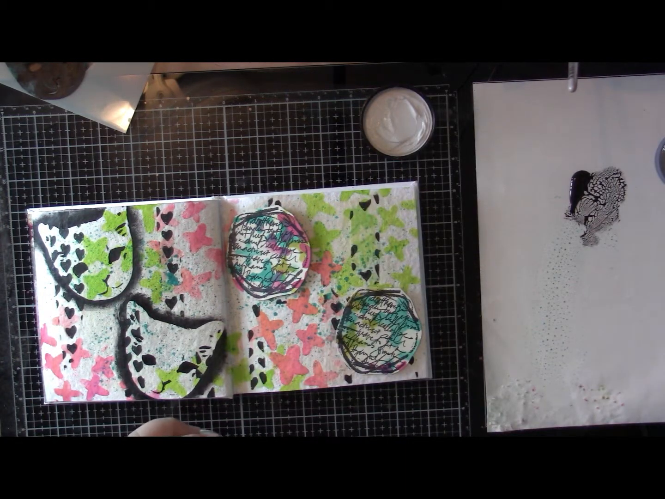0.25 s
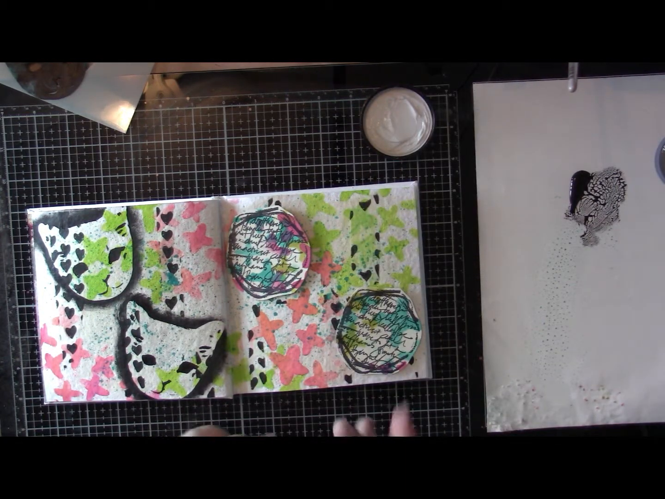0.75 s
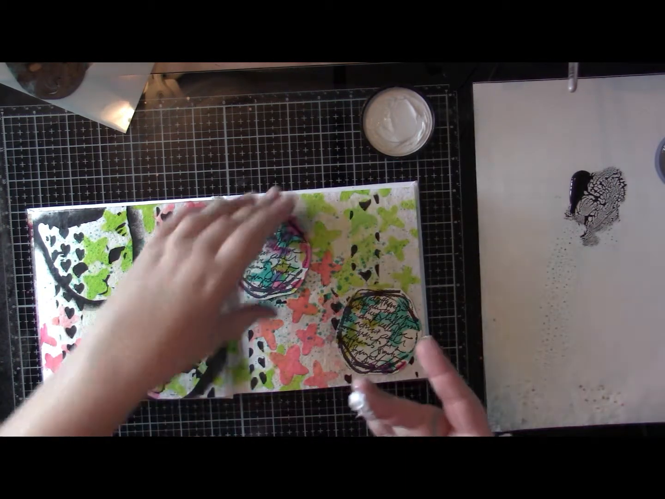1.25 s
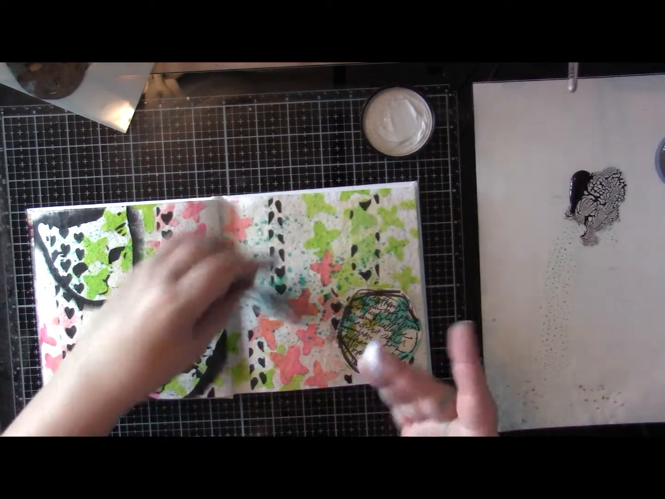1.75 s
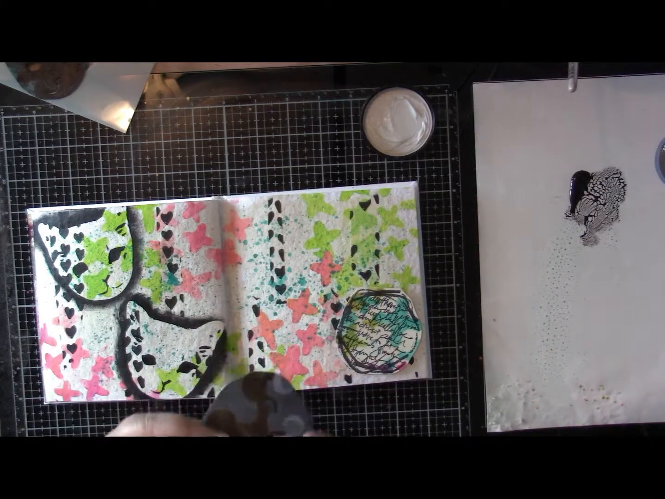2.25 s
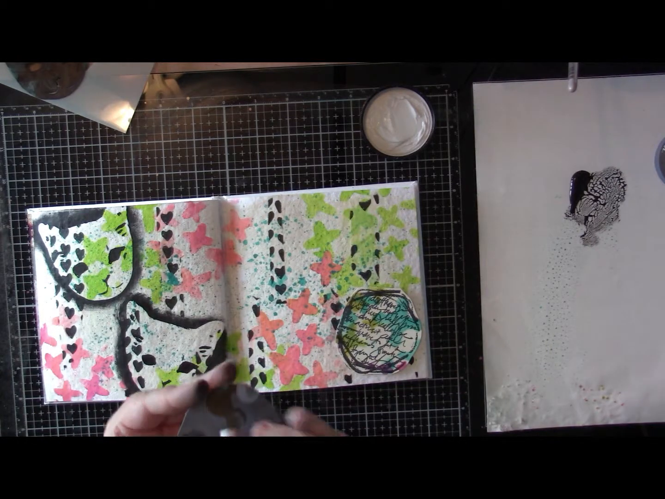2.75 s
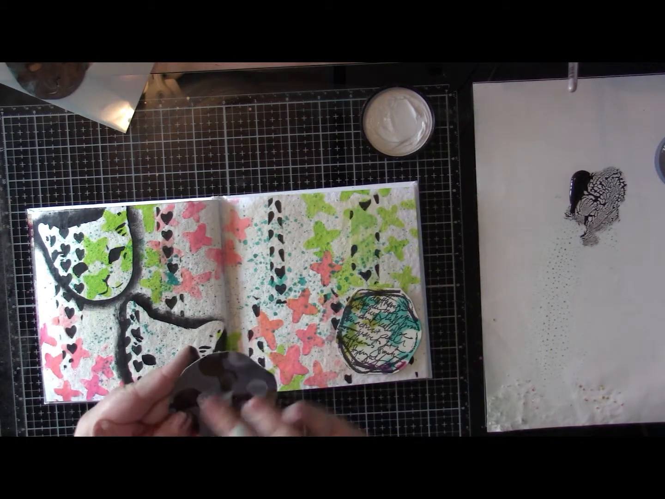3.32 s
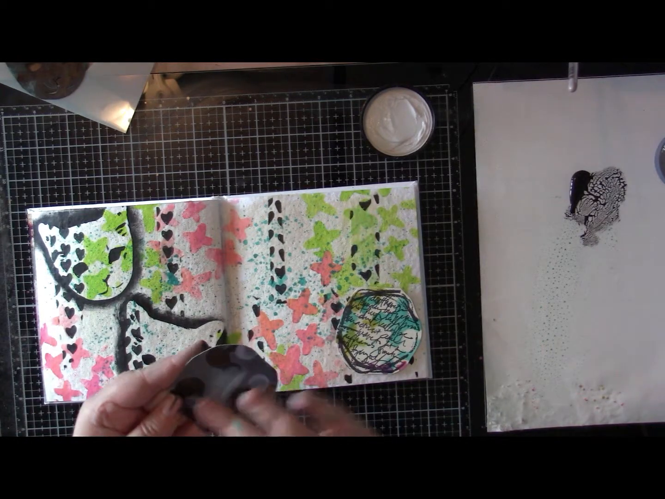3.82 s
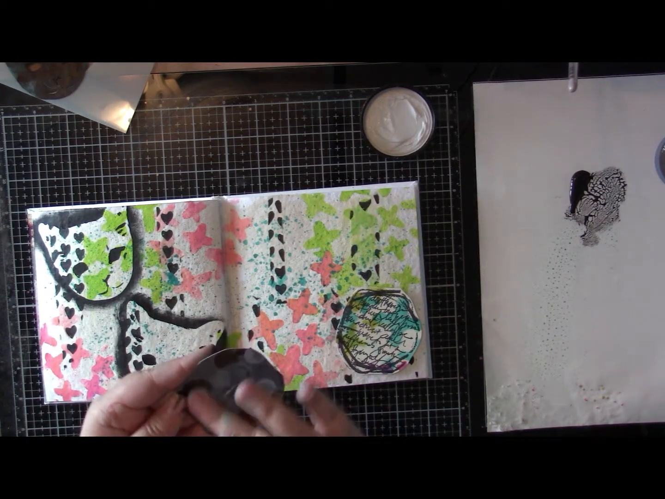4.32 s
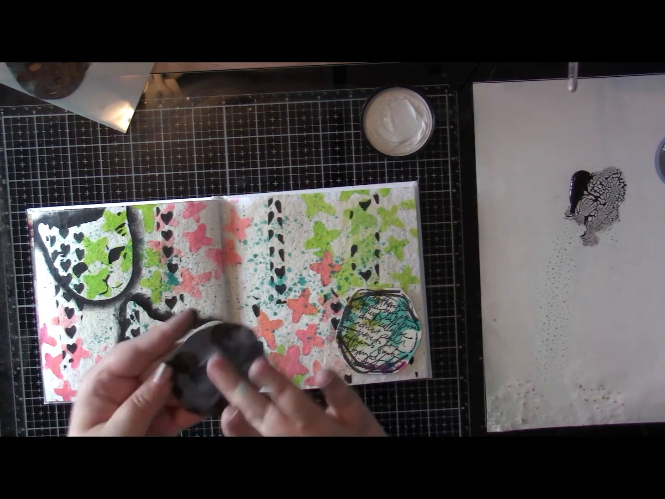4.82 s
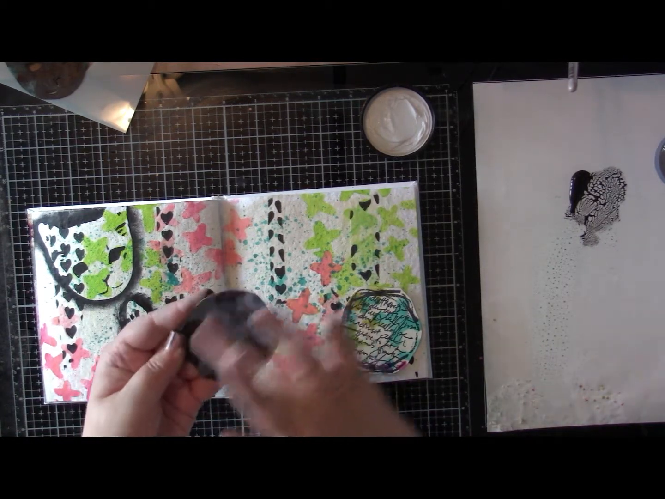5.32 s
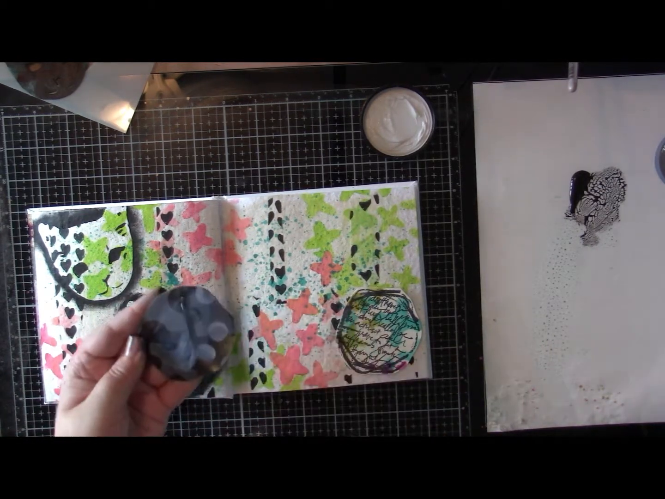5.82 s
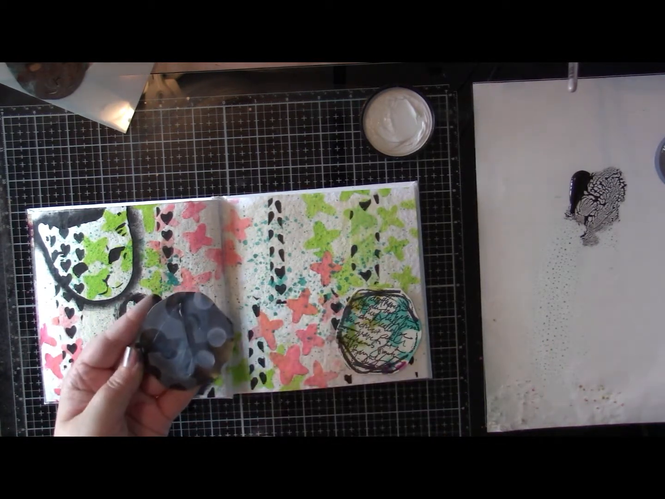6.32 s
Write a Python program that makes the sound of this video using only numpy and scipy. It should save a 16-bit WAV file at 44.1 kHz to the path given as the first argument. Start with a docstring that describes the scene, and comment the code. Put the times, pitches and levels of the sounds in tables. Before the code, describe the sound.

In a quiet room with a low wavering hum, a table is bumped and loose things rattle. A round stamp peels off a painted page with a quick creaking crackle. Fingers then rub it in short dry strokes with tiny snaps and squeaks, and tap it sharply, loudest a little past the middle and again soon after. Close microphone, short room echo.

```python
"""Stamp peeled and rubbed at a craft table

A table is bumped and its loose things rattle; a round stamp peels off a painted page in one continuous pull,
and fingers rub it and tap it sharply, among small snaps and squeaks, over a low wavering room hum. Taps and
bumps are sums of damped modes; peel, snaps, rubbing and squeaks are trains of random stick-slip clicks,
filtered and shaped in time; the hum, air and nail click are filtered noise. Decaying noise gives the room echo,
and two close ports hear almost the same sound."""
import sys
import numpy as np
from scipy import signal
from scipy.fft import rfft, irfft
from scipy.io import wavfile
from scipy.ndimage import uniform_filter1d

SR = 44100
rng = np.random.default_rng(int(sys.argv[2]) if len(sys.argv) > 2 else 0)


def wav_record(signal):
    """Record a signal, one row per channel, as 16-bit PCM in the file named by sys.argv[1]."""
    frames = np.transpose(np.atleast_2d(signal))
    bounded = np.clip(frames, -1, 1)
    # unit amplitude maps onto the largest positive 16-bit level
    quanta = np.round(bounded * 32767).astype(np.int16)
    wavfile.write(sys.argv[1], SR, quanta)


N = 289296
AGE = np.arange(SR // 2) / SR   # time since a contact [s]


def from_db(db):
    """Convert decibels to amplitude gain: 20 dB is a factor of ten."""
    return 10 ** (np.asarray(db) / 20)


def rms_one(x):
    """Normalize the mean power: scale to rms 1."""
    return x / np.sqrt(np.mean(x ** 2) + 1e-20)


def energy_one(x):
    """Normalize the total energy of a transient to 1."""
    return x / np.sqrt(np.sum(x ** 2) + 1e-20)


def at_hz(points, hz):
    """Interpolate a spectrum linearly along a logarithmic frequency axis."""
    points = np.array(points)
    return np.interp(np.log(np.maximum(hz, 1)), np.log(points[:, 0]), points[:, 1])


def in_time(rows):
    """Interpolate levels in decibels: one smoothed gain curve per column, -120 dB outside the rows."""
    s, *columns = np.transpose(rows)
    time = np.arange(N) / SR
    curves = []
    for column in columns:
        level_db = np.interp(time, s, column, left=-120, right=-120)
        curves.append(uniform_filter1d(from_db(level_db), size=400))
    return curves


def coloured(x, spectrum):
    """Minimum-phase filtering: folding the cepstrum gives a causal response of the given magnitude."""
    size = 4096
    hz = np.arange(size // 2 + 1) * SR / size
    cepstrum = irfft(np.log(from_db(at_hz(spectrum, hz))))
    folded = np.r_[cepstrum[0], 2 * cepstrum[1:size // 2]]
    response = irfft(np.exp(rfft(folded, size)))
    return signal.fftconvolve(x, response)[:len(x)]


def band(x, low_hz, high_hz):
    """Butterworth band-pass: maximally flat between two edges."""
    edges = [low_hz, min(high_hz, SR / 2 - 1000)]
    return signal.sosfilt(signal.butter(2, edges, "band", fs=SR, output="sos"), x + 1e-18)


def high_pass(x, order, cutoff_hz):
    """Butterworth high-pass: removes the lowest frequencies."""
    return signal.sosfilt(signal.butter(order, cutoff_hz, "high", fs=SR, output="sos"), x + 1e-18)


def drift(rate):
    """Slow random modulation: straight lines between normal draws of spread 1, rate draws a second."""
    knots = rng.standard_normal(4000)
    return np.interp(np.arange(N) / SR * rate, np.arange(len(knots)), knots)


def grains(per_s, spread_db, count):
    """Random impulse train: clicks of uneven size and either sign at a mean rate; rms 1."""
    sizes = from_db(spread_db * np.minimum(rng.exponential(1, count), 4))
    sizes = sizes * rng.choice([-1, 1], count)
    return rms_one(sizes * (rng.random(count) < per_s / SR))


def dying(t60):
    """Exponential decay of free vibration: 60 dB in t60 seconds."""
    return from_db(-60 * AGE / t60)


def ringing(modes, low_hz, high_hz, rise_s, pitch=1):
    """Modal synthesis: damped sines within one range, with an onset time constant rise_s; energy 1."""
    rings = []
    for k, (hz, db, t60) in enumerate(modes):
        if low_hz <= hz < high_hz:
            sine = np.sin(2 * np.pi * hz * pitch * AGE)
            rings.append((-1) ** k * from_db(db) * dying(t60) * sine)
    return energy_one(sum(rings) * (1 - np.exp(-AGE / rise_s)))


def favouring(modes, spot_hz, db_per_octave):
    """Strike-point weighting: the spot that is struck favours the modes near one pitch."""
    return [(hz, db - db_per_octave * abs(np.log2(hz / spot_hz)), t60) for hz, db, t60 in modes]


def add(track, s, sound):
    """Linear superposition: mix a sound in at time s."""
    start = round(s * SR)
    track[start:start + len(sound)] += sound[:N - start]


def room_tone(air_db=-56.5, hum_hz=335, hum_db=-2.5):
    """Stationary filtered noise for the air, and a noise band of varying level for a fan-like hum and the
    table's low ring after the bumps."""
    # air noise: (frequency [Hz], relative level [dB])
    air_spectrum = [(15, -71), (25, -38.5), (55, -17), (122, -12), (160, -11.5), (215, -11), (274, -11.5),
                    (340, -6.5), (469, -9.5), (509, -10), (552, -11.5), (1080, -21), (1660, -25),
                    (2770, -26.5), (15500, -39.5)]
    # level of the noise band before the hum_db trim: (time [s], level [dB]); the swell near 0.9 s is the table
    # ringing on after the bumps
    hum_course = [(0.0, -70), (0.51, -67), (0.89, -57), (1.17, -67), (3.85, -64.5), (4.48, -65),
                  (6.25, -54.5), (6.56, -65)]
    air = rms_one(coloured(rng.standard_normal(N), air_spectrum))
    hum = rms_one(band(rng.standard_normal(N), hum_hz * 0.85, hum_hz * 1.163))
    hum_level = np.interp(np.arange(N) / SR, *np.transpose(hum_course))
    return from_db(air_db) * air + from_db(hum_level + hum_db) * hum


def room(x, first_echo_s=.006, near_db=0.5, near_t60=0.0388):
    """Reverberation by convolution: a quick decay for near surfaces over a slower one for the walls."""
    # decay of the slow part: (frequency [Hz], t60 [s])
    wall_t60 = [(150, 0.37), (600, 0.19), (1500, 0.31), (3000, 0.32), (6000, 0.42), (12000, 0.27)]
    # colour of the echo against the direct sound: (frequency [Hz], level [dB])
    echo_spectrum = [(100, -15.5), (400, -10.5), (750, -5), (1500, -3), (3000, -11), (6000, -8),
                     (14000, -13.5)]
    edges = np.geomspace(70, 17000, 9)
    tail = 0
    for low, high in zip(edges, edges[1:]):
        walls = dying(at_hz(wall_t60, np.sqrt(low * high)))
        fade = walls + from_db(near_db) * dying(near_t60)
        echo = energy_one(band(rng.standard_normal(len(AGE)), low, high) * fade)
        tail = tail + echo * np.sqrt(2 * (high - low) / SR)   # energy in proportion to bandwidth
    response = np.r_[np.zeros(round(first_echo_s * SR)), coloured(tail, echo_spectrum)]
    return signal.fftconvolve(x, response)[:N]


def table_knocks(thump_db=30.5, board_db=25.5, rattle_db=27.5, favour_db=12.0):
    """Modal response to impact: the top swells, the boards answer at once and loose things chatter."""
    # bumps: (time [s], then levels before the trims: thump [dB], board [dB], rattle [dB],
    # favoured thump frequency [Hz])
    knocks = [(0.701, -19, -23.5, -24, 320), (0.725, -32, -27.5, -43, 312), (0.819, -31, -26.5, -34, 260),
              (1.015, -52, -45, -39.5, 380), (6.344, -32, -38.5, -35, 226)]
    # modes of the table with mat and journal on it: (frequency [Hz], relative level [dB], t60 [s])
    table_modes = [(107, -9, 0.27), (139, -6, 0.28), (178, -6, 0.21), (212.4, -14, 0.24),
                   (238.4, 3.5, 0.12), (294, -4, 0.29), (336.5, -2.5, 0.13), (356, -3, 0.27),
                   (402.3, -4.5, 0.28), (465, 3, 0.053), (529, 3.5, 0.089), (609.5, 5, 0.12),
                   (705, 4.5, 0.091), (763.4, 0.5, 0.084), (830, 6.5, 0.018), (1006, -1, 0.066),
                   (1077, 10, 0.034)]
    # colour of the chatter: (frequency [Hz], relative level [dB])
    rattle_spectrum = [(500, 8), (1300, 2), (2000, 0), (2900, 0), (4000, -7), (6500, -14), (9000, -22),
                       (15000, -36)]
    out = np.zeros(N)
    for s, thump, board, rattle, spot_hz in knocks:
        top = ringing(favouring(table_modes, spot_hz, favour_db), 0, 435, rise_s=0.0067)
        boards = ringing(table_modes, 435, 2000, rise_s=0.000081)
        chatter = grains(5900, 1.57, len(AGE)) * (dying(0.032) + 0.091 * dying(0.42))
        chatter = energy_one(coloured(chatter, rattle_spectrum))
        knock = from_db(thump + thump_db) * top + from_db(board + board_db) * boards
        add(out, s, knock + from_db(rattle + rattle_db) * chatter)
    return high_pass(out, 4, 105)


def nail_clicks(t60=0.0085):
    """Hard-contact impulse: a tiny contact gives a very short burst of mostly treble."""
    # clicks: (time [s], peak level [dB])
    clicks = [(.252, -30.5)]
    # (frequency [Hz], relative level [dB])
    nail_spectrum = [(2500, -30), (4500, -1.5), (8500, 6), (13000, -2), (15500, -6)]
    out = np.zeros(N)
    for s, peak in clicks:
        click = coloured(rng.standard_normal(len(AGE)) * dying(t60), nail_spectrum)
        add(out, s, from_db(peak) * click / np.abs(click).max())
    return out


def gripping(level_db=-72, slips_per_s=700, waver_db=3.5):
    """Stick-slip through a resonance: faint grit as the holding hand slips while the stamp is cleaned."""
    holding, = in_time([(s, level_db) for s in (2.1, 4.9)])   # start and end [s]
    slips = rms_one(band(grains(slips_per_s, 3.0, N), 2700, 4500))
    return holding * from_db(waver_db * drift(25)) * slips


def squeaking(level_db=-10.0, length_s=0.06, lead_s=0.028, width=0.037):
    """Stick-slip resonance: skin slips swell and fade in one narrow band that the grip sets."""
    # squeaks: (time near the fullest swell [s], level before the trim [dB], centre frequency [Hz])
    squeaks = [(1.95, -46, 2750), (2.284, -40, 3050), (2.608, -54, 3320), (2.849, -52, 3230),
               (2.925, -50, 3440), (3.149, -56, 3340), (3.68, -55, 2700), (3.831, -48.5, 2780),
               (4.111, -47.5, 2840), (4.819, -50, 4400), (4.953, -54.5, 5430)]
    out = np.zeros(N)
    swell = np.sin(np.pi * np.minimum(AGE / length_s, 1))
    for s, db, hz in squeaks:
        slips = rms_one(band(grains(2300, 2.0, len(AGE)), hz / (1 + width), hz * (1 + width)))
        add(out, s - lead_s, from_db(db + level_db) * swell * slips)
    return out


def paper_snaps(low_db=18.0, ring_db=22.5, t60=0.027, rise_s=0.00042, sheet_share=0.21):
    """Impulsive excitation: paper or tacky paint slips in a cluster that rings the stiff sheet."""
    # snaps: (time [s], ring level before the trim [dB], thud level before the trim [dB],
    # ring frequency [Hz])
    snaps = [(1.002, -47.5, -40, 3620), (1.362, -54, -40, 2730), (1.559, -49, -37, 5370),
             (1.628, -33.5, -54, 4100), (1.733, -30.5, -49, 2100), (1.988, -38, -38.5, 2860),
             (2.006, -38.5, -37, 3680), (2.063, -40.5, -37, 2650), (2.185, -49, -49, 2980),
             (2.259, -51, -45, 2470), (2.718, -38, -37.5, 2250), (2.975, -38, -42.5, 3560),
             (3.961, -47.5, -47.5, 2820), (4.653, -56, -49.5, 2660), (4.785, -46, -54, 3030)]
    tick_db = -12   # bright tick against the ring
    out = np.zeros(N)
    for s, middle, low, ring_hz in snaps:
        slips = grains(8100, 1.0, len(AGE)) * dying(t60) * (1 - np.exp(-AGE / rise_s))
        thud = energy_one(band(slips, 380, 1300))
        own_ring = band(slips, ring_hz * 0.872, ring_hz * 1.07)
        ring = energy_one(own_ring + sheet_share * band(slips, 2600, 5100))
        tick = energy_one(band(slips, 6800, 10700))
        ring_level = middle + ring_db
        sheet = from_db(ring_level) * ring + from_db(ring_level + tick_db) * tick
        add(out, s, from_db(low + low_db) * thud + sheet)
    return out


def peeling(creak_db=-0.5, crackle_db=-3.0):
    """Adhesive fracture: threads of tacky paint snap in clumps while the page creaks in coarser slips."""
    # the peel's course in three joined stretches, each a list of (time [s], then levels before the trims: creak
    # [dB], crackle [dB])
    stretches = [
        [(1.51, -55, -68), (1.53, -65, -54), (1.566, -45.5, -47), (1.606, -52, -32.5), (1.625, -58, -43)],
        [(1.625, -45, -48), (1.631, -41, -31.5), (1.653, -41, -34.5), (1.663, -35.5, -42.5), (1.7, -55, -49)],
        [(1.7, -63, -53), (1.712, -56, -43.5), (1.736, -40.5, -30), (1.748, -48, -41.5), (1.78, -61, -53)],
    ]
    # colour of the creak, then of the crackle: (frequency [Hz], relative level [dB])
    creak_spectrum = [(200, -22.5), (450, 3.5), (800, 1.5), (1150, 7), (1500, -2), (2000, 0), (2800, -40)]
    crackle_spectrum = [(1000, -16), (2100, -6), (3000, 1), (4000, -0.5), (4500, -7), (5300, -3.5),
                        (7000, -9), (11000, -13.5), (14000, -22), (15500, -24)]
    threads_per_s, creaks_per_s = 610, 500   # snaps in each band; slips of the page
    clump_db, clumps_per_s = 3.0, 160   # threads give way in bunches
    thread_spread_db, thread_patchy_db = 2.8, 3.5
    creak, crackle = sum(np.array(in_time(stretch)) for stretch in stretches)
    clumps = from_db(clump_db * drift(clumps_per_s))
    slips = rms_one(coloured(grains(creaks_per_s, 2.0, N) * clumps, creak_spectrum))
    edges = np.geomspace(1500, 16000, 12)
    threads = 0
    for low, high in zip(edges, edges[1:]):
        snaps = grains(threads_per_s, thread_spread_db, N) * clumps
        threads = threads + band(snaps * from_db(thread_patchy_db * drift(70)), low, high)
    threads = rms_one(coloured(threads, crackle_spectrum))
    return from_db(creak_db) * creak * slips + from_db(crackle_db) * crackle * threads


def stroke_envelope(length_s):
    """Friction follows speed: a finger lands, speeds up and slows down along an arch, then lifts."""
    attack_s, release_s = 0.018, 0.014   # landing ramp; lifting time constant
    arch_db = 5   # middle of the stroke against its ends
    landing = np.minimum(AGE / attack_s, 1)
    arch = from_db(arch_db * (np.sin(np.pi * np.minimum(AGE / length_s, 1)) - 1.5))
    lifting = np.exp(-np.maximum(AGE - length_s, 0) / release_s)
    return landing * arch * lifting


def rubbing(scuff_db=-0.5, hiss_db=0.0):
    """Dry friction noise: fingertips catch on the stamp in a grainy scuff and glide in a fine hiss."""
    # strokes: (start [s], length [s], then levels before envelope and trims: scuff [dB], skin hiss [dB])
    strokes = [(0.993, 0.11, -52, -67), (1.252, 0.15, -60.5, -65), (1.887, 0.11, -50.5, -54.5),
               (2.011, 0.064, -47.5, -56.5), (2.261, .04, -43, -52), (2.31, 0.046, -62, -55.5),
               (2.441, 0.098, -63, -62.5), (2.564, 0.11, -55.5, -57), (2.708, 0.018, -41.5, -48),
               (2.814, 0.071, -55, -57), (2.913, 0.09, -47.5, -59), (3.004, 0.27, -60.5, -64.5),
               (3.31, 0.14, -59, -60.5), (3.559, 0.038, -53.5, -53.5), (3.644, 0.098, -63.5, -61),
               (3.778, 0.11, -60.5, -57.5), (3.93, 0.071, -60, -58.5), (4.069, 0.088, -60.5, -57.5),
               (4.201, .078, -62, -57.5), (4.372, 0.19, -56, -59.5), (4.522, 0.026, -43, -49),
               (4.688, 0.055, -57, -68), (4.784, 0.053, -55.5, -60), (4.917, .06, -63.5, -58.5),
               (5.15, 0.087, -63, -59), (5.263, 0.08, -61.5, -61.5), (5.421, 0.12, -57.5, -58.5),
               (5.726, 0.16, -63, -64)]
    # colour of the scuff, then of the skin hiss: (frequency [Hz], relative level [dB])
    scuff_spectrum = [(400, -16.5), (1200, -4.5), (1900, 0.5), (2900, 4), (4300, 3), (6000, -6.5),
                      (9000, -30)]
    hiss_spectrum = [(3000, -13), (5500, -2.5), (7500, -3), (10000, -3), (12500, -10.5), (15500, -21.5)]
    flutter_db, flutter_per_s = 4.2, 45   # the pressure of the finger wavers
    scuff, hiss = np.zeros((2, N))
    for s, length_s, catch_db, glide_db in strokes:
        speed = stroke_envelope(length_s)
        add(scuff, s, from_db(catch_db + scuff_db) * speed)
        add(hiss, s, from_db(glide_db + hiss_db) * speed)
    catches = grains(3100, 2.8, N) * from_db(4.45 * drift(110))
    catching = rms_one(coloured(catches, scuff_spectrum))
    gliding = rms_one(coloured(grains(20000, 1.7, N), hiss_spectrum))
    pressure = from_db(flutter_db * drift(flutter_per_s))
    return pressure * (scuff * catching + hiss * gliding)


def stamp_taps(body_db=23.5, middle_db=20.5, ring_db=18.5, crack_db=27.0, flex_s=0.00104, favour_db=35.0):
    """Damped bending modes: each tap briefly rings the stamp and the hollow of the hand around it."""
    # taps: (time [s], then levels before the trims: body [dB], middle [dB], ring [dB], crack [dB],
    # body pitch [Hz], favoured ring frequency [Hz])
    taps = [(2.07, -32.5, -53, -30.5, -44.5, 374, 2540), (2.719, -53, -46, -58, -60, 394, 2600),
            (3.236, -20, -24, -32.5, -54.5, 660, 3640), (4.425, -17, -18, -11.5, -40, 648, 2890),
            (4.969, -36, -47, -53, -67, 440, 3170), (5.088, -33, -29, -36.5, -60.5, 503, 2840),
            (5.203, -44.5, -63, -55, -58, 552, 3430), (5.337, -20, -21, -14, -45.5, 606, 2970),
            (5.673, -47, -53.5, -69, -82, 335, 2420), (6.268, -46.5, -52, -66, -78, 630, 2950)]
    # stamp and hollow of the hand: (multiple of the body pitch [ratio], relative level [dB], t60 [s])
    body_modes = [(.66, -4, 0.013), (.93, 3.5, 0.014), (1.2, 0.5, 0.016), (1.5, 2.5, 0.0098)]
    # bending modes damped by the fingers: (frequency [Hz], relative level [dB], t60 [s])
    stamp_modes = [(1032, 4.5, 0.0093), (1317, -7.5, 0.019), (1670, 1.5, 0.0069), (2220, -7.5, 0.012),
                   (2630, 4, 0.012), (2830, 0.5, 0.019), (3117, 7.5, 0.013), (3610, 8, 0.015),
                   (4200, -4, 0.007), (4540, 0.5, 0.012), (4910, -1, 0.0054), (5520, -5.5, 0.011),
                   (6820, -7, 0.0086)]
    # colour of the crack: (frequency [Hz], relative level [dB])
    crack_spectrum = [(3000, -38.5), (6500, -5), (9000, -1.5), (12000, -8.5), (15000, -21.5)]
    rim_db = -9   # the rim's high modes against the ring
    out = np.zeros(N)
    for s, body, middle, ring, crack, body_hz, ring_hz in taps:
        hollow = from_db(body + body_db) * ringing(body_modes, 0, np.inf, 0.0014, body_hz)
        bend = from_db(middle + middle_db) * ringing(stamp_modes, 0, 2400, 0.00035)
        favoured = favouring(stamp_modes, ring_hz, favour_db)
        clack = from_db(ring) * ringing(favoured, 2400, 4000, 0.00043)
        rim = from_db(ring + rim_db) * ringing(stamp_modes, 4000, 9000, 0.00066)
        burst = rng.standard_normal(len(AGE)) * dying(0.016)
        contact = from_db(crack + crack_db) * energy_one(coloured(burst, crack_spectrum))
        add(out, s + flex_s, hollow + bend + from_db(ring_db) * (clack + rim) + contact)
    return high_pass(out, 2, 170)


def scene(width_db=-23.0, table_room_db=0.0, hiss_side_db=-67.5, port_lag_s=.000004):
    """Mid-side superposition: two close ports differ only by echoes, faint hiss and a tiny lag."""
    # microphone noise that differs between the ports: (frequency [Hz], relative level [dB])
    side_spectrum = [(40, -11), (400, -1.5), (2000, -13), (8000, -27), (14000, -51)]
    table = table_knocks()
    hands = stamp_taps() + nail_clicks() + paper_snaps() + peeling() + rubbing() + gripping() + squeaking()
    radiated = hands + from_db(table_room_db) * table
    mid = table + hands + room(radiated) + room_tone()
    hiss = rms_one(coloured(rng.standard_normal(N), side_spectrum))
    lag = port_lag_s / 2 * SR * np.gradient(hands)   # a small delay is nearly a slope
    side = from_db(width_db) * room(radiated) + from_db(hiss_side_db) * hiss + lag
    return np.array([mid + side, mid - side])


def record(dry):
    """Low-pass response: the microphone softens the highest treble, then the top is cut steeply."""
    soft = signal.sosfilt(signal.butter(2, 14000, fs=SR, output="sos"), dry)
    return signal.sosfilt(signal.ellip(10, .1, 80, 15400, fs=SR, output="sos"), soft)


dry = scene()
out = record(dry)
wav_record(out)
```